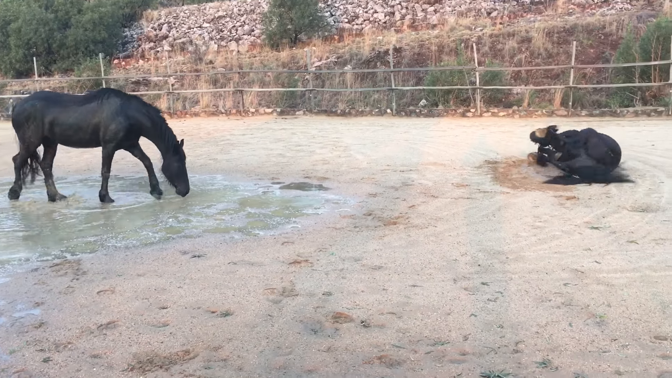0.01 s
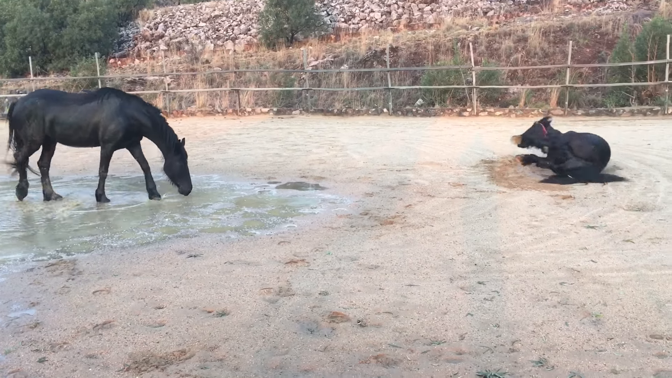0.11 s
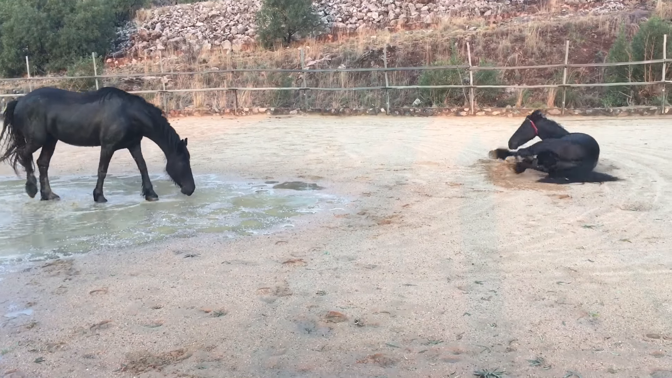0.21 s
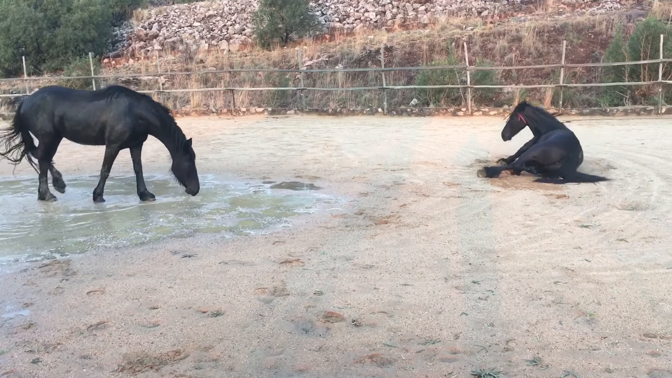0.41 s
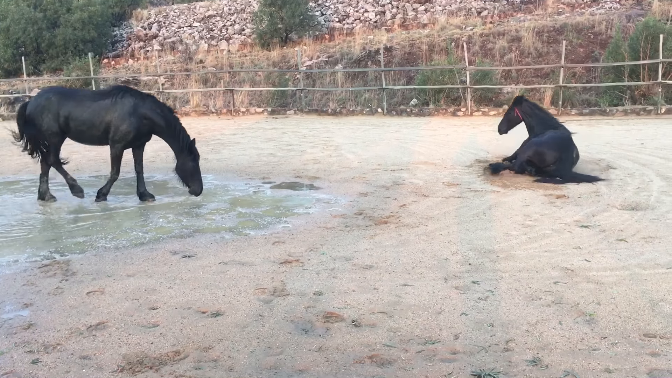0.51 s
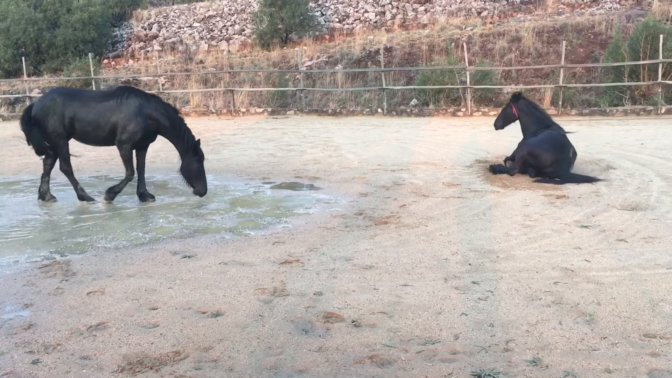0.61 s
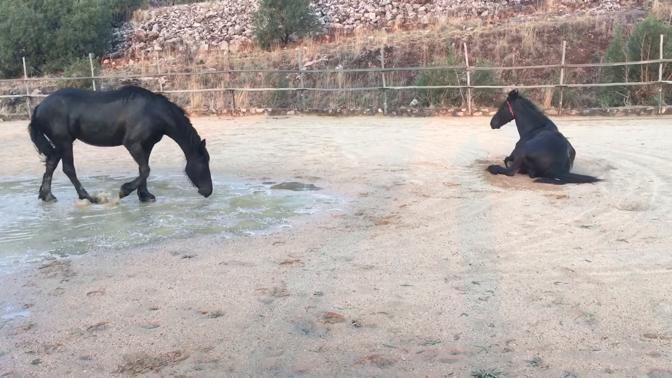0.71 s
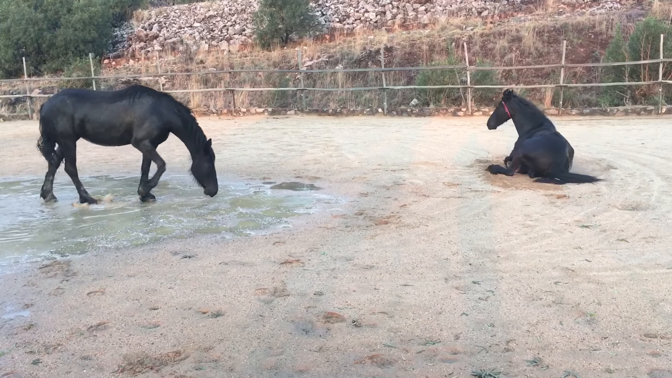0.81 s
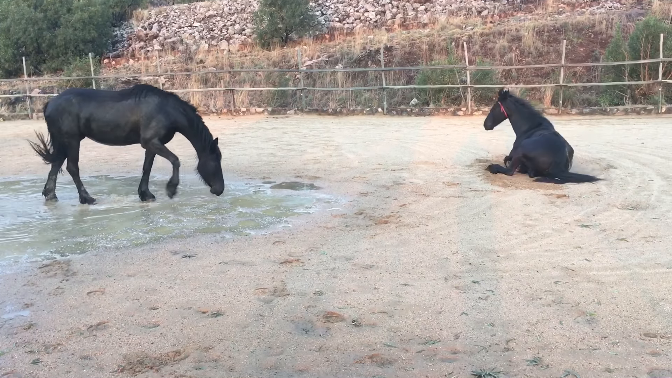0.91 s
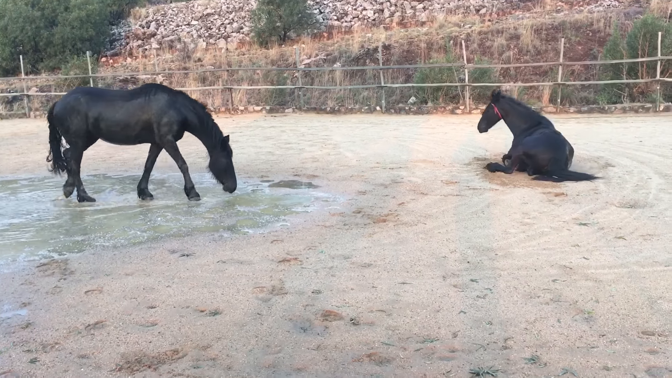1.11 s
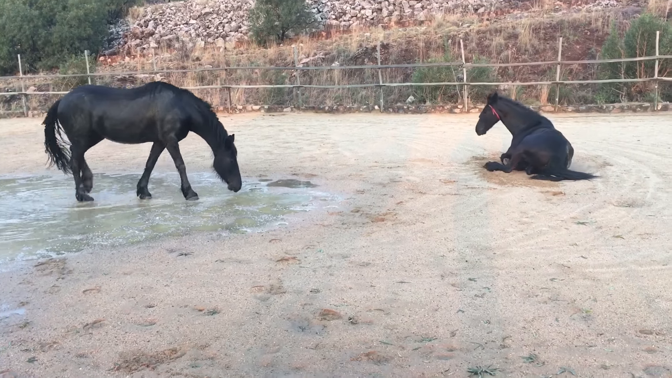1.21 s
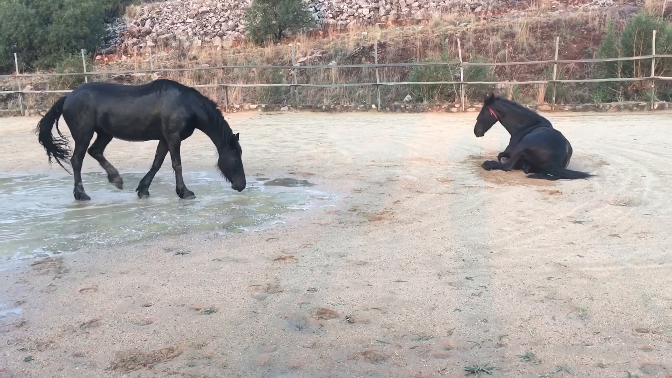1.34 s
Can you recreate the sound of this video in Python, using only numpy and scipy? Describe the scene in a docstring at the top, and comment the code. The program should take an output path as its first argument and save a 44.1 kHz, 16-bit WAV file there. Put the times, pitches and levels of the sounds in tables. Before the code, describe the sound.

Horse hooves splash in a shallow puddle. From the start, fine spray patters with small bubbly blips; a soft splash and bright drop ticks come around 0.2 s, then a thinner trickle. At 0.73-0.75 s a sharp double slap of water bursts, followed by gurgles and a dull plop near 1.0 s, fading drips to 1.3 s. Low wind buffets peak around 0.83 s; open outdoor air, very short faint echo.

```python
"""Horse wading through a puddle

Hooves in a shallow puddle in an open sand arena: four splashes of shaped droplet clicks.
Spray patters back as denser clicks, larger drops tick, trapped air gurgles as rising, dying tones.
Behind: wind as coloured noise with a cluster of low buffets, faint open air and a short echo."""
import sys
import numpy as np
from scipy import signal
from scipy.fft import rfft, irfft
from scipy.io import wavfile

SR = 44100
rng = np.random.default_rng(int(sys.argv[2]) if len(sys.argv) > 2 else 0)


def transcribe(signal):
    """Save signal, clipped to [-1, 1], as a 16-bit WAV file at the path in sys.argv[1]."""
    frames = np.atleast_2d(signal).T
    limited = np.clip(frames, -1, 1)
    pcm = np.round(limited * 32767).astype(np.int16)
    wavfile.write(sys.argv[1], SR, pcm)


N = 59535
T = np.arange(N) / SR

# spectrum of falling water: (frequency [Hz], level [dB])
SPRAY_SPECTRUM = [(700, -5), (1500, -1.5), (2600, 4.5), (4200, 5), (5000, 2), (6100, 4.5), (7600, 1),
                  (9200, 6), (10600, -0.5), (12400, 5.5), (16000, -4)]


def undb(db):
    """Decibels to gain."""
    return 10 ** (np.asarray(db) / 20)


def unit(x):
    """Scale to rms 1."""
    return x / np.sqrt(np.mean(x ** 2) + 1e-18)


def curve(rows):
    """Gain that follows (time [s], level [dB]) points."""
    time_s, level_db = np.array(rows).T
    return undb(np.interp(T, time_s, level_db))


def colour(x, points, top_hz=SR):
    """Shape to a spectrum of (frequency [Hz], level [dB]), dull above top_hz, at rms 1."""
    point_hz, point_db = np.array(points).T
    hz = np.maximum(np.fft.rfftfreq(N, 1 / SR), 1)
    low_end = np.minimum(hz / point_hz[0], 1) ** 2
    high_end = 1 / np.sqrt(1 + (hz / top_hz) ** 8)
    gain = undb(np.interp(np.log(hz), np.log(point_hz), point_db))
    return unit(irfft(rfft(x) * low_end * high_end * gain, N))


def patter(per_s_per_band, spread_db):
    """Random droplet clicks, many small and a few large, drawn separately for each band."""
    # band edges: (frequency [Hz])
    edges_hz = [0, 1500, 2800, 5000, 8000, 11000, 23000]
    hz = np.fft.rfftfreq(N, 1 / SR)
    spectrum = 0
    for low_hz, high_hz in zip(edges_hz, edges_hz[1:]):
        hits = rng.random(N) < per_s_per_band / SR
        size = undb(spread_db * np.minimum(rng.exponential(size=N), 5))
        clicks = hits * size * rng.choice([-1, 1], N)
        in_band = (hz >= low_hz) & (hz < high_hz)
        spectrum = spectrum + rfft(clicks) * in_band
    return irfft(spectrum, N)


def ring(start_s, hz, fall_s, attack_s, rise_per_s=0):
    """A dying oscillation whose pitch may climb or sink."""
    age_s = np.clip(T - start_s, 0, attack_s + 10 * fall_s)
    swell = np.sin(np.pi / 2 * np.minimum(age_s / attack_s, 1)) ** 2
    decay = np.exp(-np.maximum(age_s - attack_s, 0) / fall_s)
    cycles = hz * (age_s + rise_per_s * age_s ** 2 / 2)
    return swell * decay * np.sin(2 * np.pi * cycles)


def splashes():
    """Each hoof tears the surface into a burst of droplets."""
    # hoof splashes: (start [s], attack [s], hold [s], fall time [s], level [dB],
    #                 dull above [Hz], droplets in each band [1/s])
    hoof_splashes = [(0.18, 0.025, 0.025, 0.0067, -44, 16000, 700),
                     (0.7286, 0.0035, 0.0052, 0.011, -34, 14300, 3760),
                     (0.7517, 0.0021, 0.0022, 0.0052, -37.5, 4450, 2500),
                     (0.995, 0.0024, 0.0066, 0.013, -53, 2090, 1030)]
    # (frequency [Hz], level [dB])
    spectrum = [(200, 2), (320, 0.5), (550, -8.5), (850, -4), (1250, -1), (1900, 3), (2500, -0.5),
                (3800, -2), (4900, -4), (6200, 4.5), (7600, -5), (9200, 2), (10600, -10), (12300, -3),
                (16000, -1)]
    out = np.zeros(N)
    for start_s, attack_s, hold_s, fall_s, db, top_hz, per_s in hoof_splashes:
        age_s = T - start_s
        attack = np.clip(age_s / attack_s, 0, 1)
        decay = np.exp(-np.maximum(age_s - attack_s - hold_s, 0) / fall_s)
        droplets = colour(patter(per_s, spread_db=1.8), spectrum, top_hz)
        out += undb(db) * attack * decay * droplets
    return out


def spray():
    """Fine drops rain back on the puddle."""
    # falling spray: (time [s], level [dB])
    spray_level = [(0, -52.5), (.08, -54), (.122, -48), (.14, -54.5), (.18, -51.5), (.255, -51),
                   (.285, -56), (.38, -55), (.44, -50), (.485, -56.5), (.60, -53), (.675, -53.5),
                   (.71, -57), (.78, -53.5), (.83, -59), (.88, -62), (.91, -57.5), (1.01, -54.5),
                   (1.075, -57.5), (1.17, -48.5), (1.225, -60.5), (1.29, -58.5), (1.35, -64.5)]
    droplets = patter(per_s_per_band=3500, spread_db=3)
    return curve(spray_level) * colour(droplets, SPRAY_SPECTRUM)


def drops():
    """Larger drops smack the surface: a short tick with a little noisy spatter."""
    # single drops: (start [s], pitch [Hz], level [dB])
    single_drops = [(0.125, 6950, -36), (0.147, 9900, -44), (0.168, 6000, -39), (0.2048, 8900, -33.5),
                    (0.3, 9750, -40), (0.475, 3930, -42), (0.854, 9100, -44.5), (0.901, 3670, -44),
                    (.976, 8330, -41.5), (1.060, 5360, -43.5), (1.30, 5650, -45)]
    fall_cycles, attack_s = 2, 0.0007
    spatter_gain, spatter_fall_s = 0.45, 0.0055
    out = np.zeros(N)
    for start_s, hz, db in single_drops:
        tick = ring(start_s, hz, fall_cycles / hz, attack_s)
        envelope = (T >= start_s) * np.exp(-np.abs(T - start_s) / spatter_fall_s)
        spatter = envelope * colour(rng.standard_normal(N), SPRAY_SPECTRUM)
        out += undb(db) * (tick + spatter_gain * spatter)
    return out


def bubbles():
    """Air trapped round the hooves rings, wobbles in level and rises in pitch as it nears the surface."""
    # single bubbles: (start [s], starting pitch [Hz], level [dB], ring time [s],
    #                  pitch rise as a share of the start [1/s])
    single_bubbles = [(.000, 880, -46.5, 0.006, 7.6), (.019, 1590, -45.5, 0.0062, 7.5),
                      (.043, 2055, -43.5, 0.0028, 15), (.086, 1020, -40, 0.0042, 5.1),
                      (.147, 1430, -47, .003, 6), (.227, 1700, -39.5, 0.0035, 6),
                      (.317, 1061, -45.5, 0.005, 6), (.734, 1180, -33.5, 0.0036, 4.6),
                      (.733, 318, -43.5, 0.015, 3.6), (.7535, 1920, -34.5, 0.0028, 5.9),
                      (.788, 804, -38, 0.0043, 1), (0.846, 1202, -38, 0.0057, 5.9),
                      (.907, 1006, -38, 0.0058, 13.4), (.931, 1614, -49.5, 0.0034, 3),
                      (.949, 1990, -49, 0.0032, 12), (.967, 1250, -47, 0.0034, 6.3),
                      (.9955, 610, -36, 0.0085, 36.3), (1.017, 1090, -41, 0.0054, 16),
                      (1.035, 1870, -47, .004, 6), (1.043, 710, -45.5, 0.003, 31),
                      (1.095, 1320, -41.5, 0.0031, 2.7)]
    attack_share = 0.77  # of ring time: longer-ringing bubbles swell more slowly
    wobble_depth, wobble_top_hz = 0.24, 220
    lowpass = signal.butter(2, wobble_top_hz, fs=SR, output="sos")
    wobble = unit(signal.sosfilt(lowpass, rng.standard_normal(N)))
    tones = np.zeros(N)
    for start_s, hz, db, fall_s, rise_per_s in single_bubbles:
        tones += undb(db) * ring(start_s, hz, fall_s, attack_share * fall_s, rise_per_s)
    return tones * (1 + wobble_depth * wobble)


def churn():
    """A crowd of small bubbles in the stirred water, each a dying tone that rises in pitch."""
    # churning water: (time [s], level [dB])
    churn_level = [(0, -50), (.03, -54), (.07, -56.5), (.12, -52), (.175, -61.5), (.215, -48), (.26, -57.5),
                   (.42, -63), (.735, -61.5), (.765, -51), (.85, -54), (.885, -60), (1.03, -55),
                   (1.13, -62), (1.18, -58), (1.35, -65)]
    bubbles_per_s, size_spread_db = 1000, 4
    middle_hz, spread_octaves = 1552, 0.45
    fall_cycles, rise_per_s = 4.2, 7.6
    out = np.zeros(2 * N)
    age_s = T[:SR // 20]
    count = int(bubbles_per_s * N / SR)
    places = rng.integers(0, N, size=count)
    chance = rng.standard_normal((count, 2))
    for at, (pitch, size) in zip(places, chance):
        hz = np.clip(middle_hz * 2 ** (spread_octaves * pitch), 500, 8000)
        tone = np.sin(2 * np.pi * hz * (age_s + rise_per_s * age_s ** 2 / 2))
        decay = np.exp(-age_s * hz / fall_cycles)
        out[at:at + len(age_s)] += undb(size_spread_db * size) * tone * decay
    return curve(churn_level) * unit(out[:N])


def echo(water):
    """Faint scatter from ground and bank: a dying noise tail convolved with the water."""
    level_db, fall_s = -13.5, 0.019
    noise = colour(rng.standard_normal(N), [(200, -10.5), (2000, -2.5), (16000, -6)])
    tail = noise * np.exp(-T / fall_s)
    scatter = signal.fftconvolve(water, tail / np.linalg.norm(tail))[:N]
    return undb(level_db) * scatter


def wind():
    """Eddies rumble on the microphone as low noise; dull buffets ring briefly and sink in pitch."""
    # wind rumble: (time [s], level [dB])
    wind_level = [(0, -45), (.2, -45.5), (.28, -48), (.42, -39), (.49, -45), (.59, -38.5), (.65, -43),
                  (.72, -35.5), (.80, -31.5), (.87, -30), (.95, -45.5), (1.0, -36), (1.07, -40.5),
                  (1.12, -46.5), (1.35, -39.5)]
    # (frequency [Hz], level [dB])
    spectrum = [(20, -43), (32, -1), (45, -1.5), (68, 4), (97, -6), (145, -12), (250, -30), (450, -45.5),
                (1000, -61)]
    # low buffets: (start [s], starting pitch [Hz], level [dB], ring time [s])
    low_buffets = [(0.775, 61.8, -25.5, 0.065), (0.81, 146.4, -26, 0.015), (0.828, 106.6, -15.5, 0.0063),
                   (.855, 86, -27, 0.02), (1.044, 70.6, -26.5, 0.0023)]
    out = curve(wind_level) * colour(rng.standard_normal(N), spectrum)
    for start_s, hz, db, fall_s in low_buffets:
        out += undb(db) * ring(start_s, hz, fall_s, attack_s=0.00563, rise_per_s=-8.5)
    return out


def open_air():
    """Steady faint noise of the open arena."""
    # (frequency [Hz], level [dB])
    spectrum = [(100, 7), (300, 8), (520, -4), (800, -3), (1200, 1.5), (2200, -20), (16000, -29.5)]
    level_db = -58
    return undb(level_db) * colour(rng.standard_normal(N), spectrum)


def scene():
    """Water and its echo over wind and open air."""
    water = splashes() + spray() + drops() + bubbles() + churn()
    mix = water + echo(water) + wind() + open_air()
    return mix[None]


def record(dry):
    """The recorder cuts the deepest rumble and the top."""
    low_cut_hz, top_hz = 33, 15750
    highpass = signal.butter(4, low_cut_hz, "high", fs=SR, output="sos")
    lowpass = signal.ellip(10, 0.2, 70, top_hz, fs=SR, output="sos")  # ripple, stopband [dB]
    return signal.sosfilt(lowpass, signal.sosfilt(highpass, dry))


dry = scene()
out = record(dry)
transcribe(out)
```